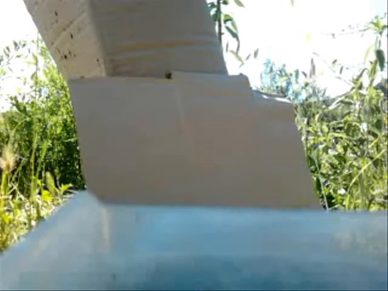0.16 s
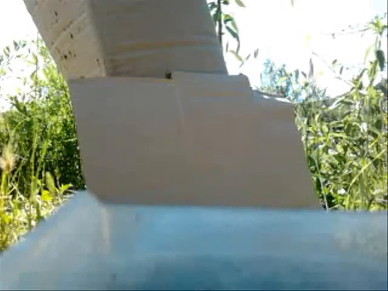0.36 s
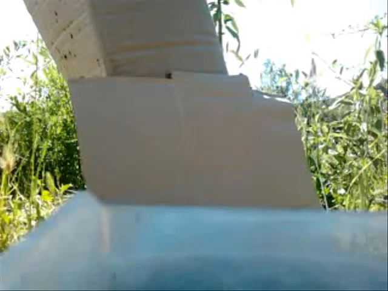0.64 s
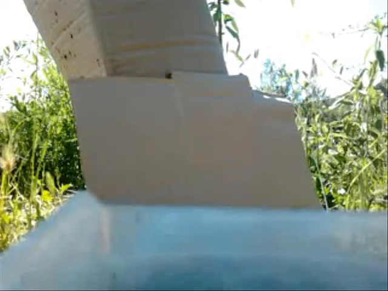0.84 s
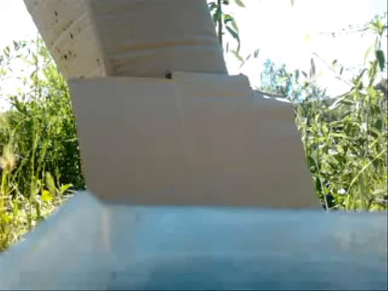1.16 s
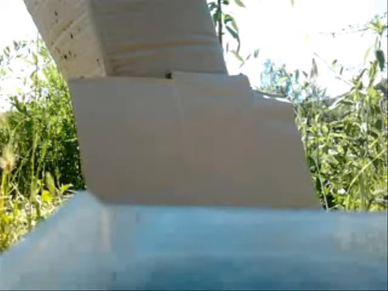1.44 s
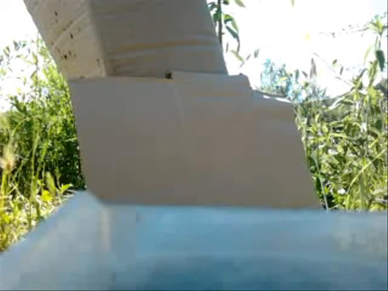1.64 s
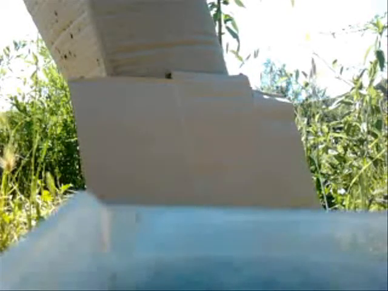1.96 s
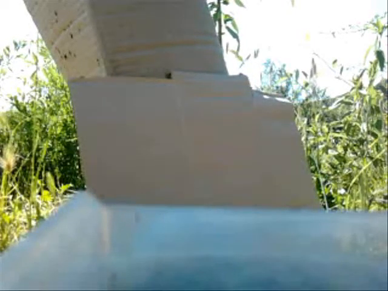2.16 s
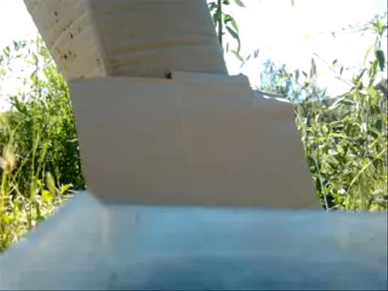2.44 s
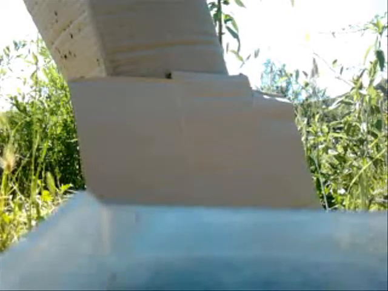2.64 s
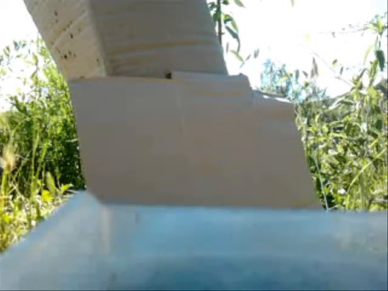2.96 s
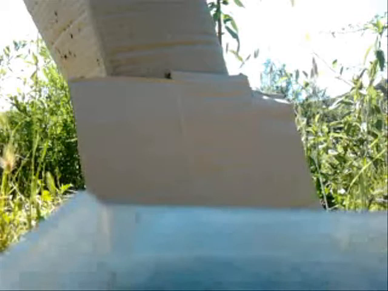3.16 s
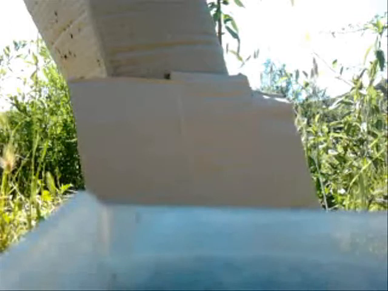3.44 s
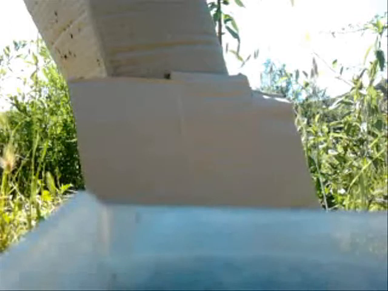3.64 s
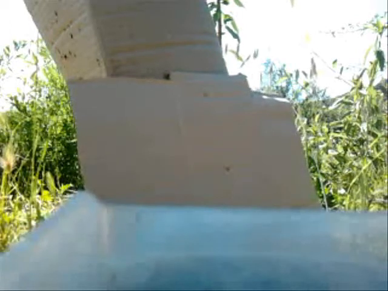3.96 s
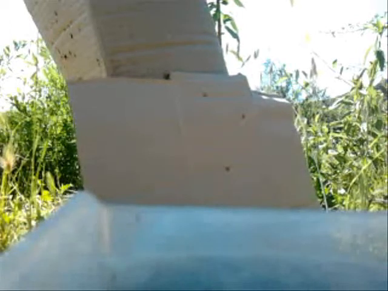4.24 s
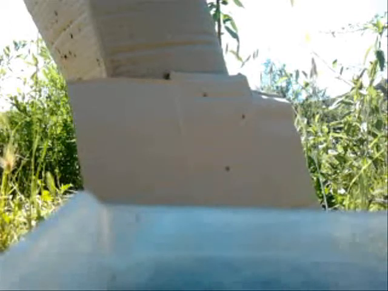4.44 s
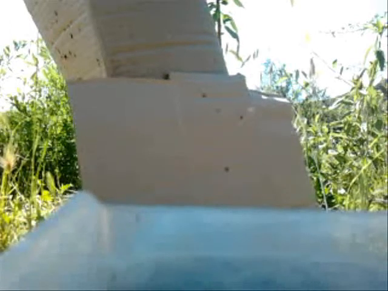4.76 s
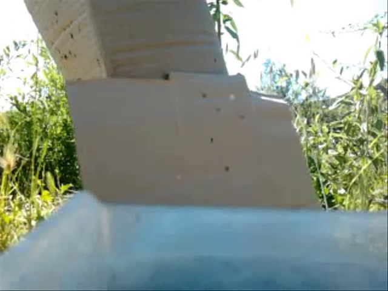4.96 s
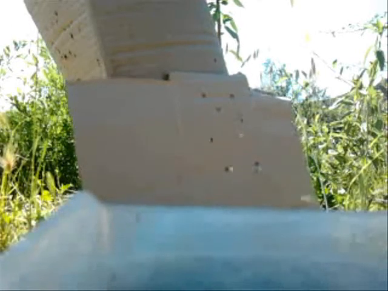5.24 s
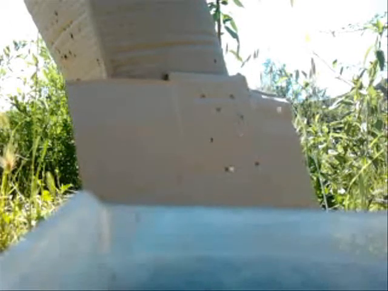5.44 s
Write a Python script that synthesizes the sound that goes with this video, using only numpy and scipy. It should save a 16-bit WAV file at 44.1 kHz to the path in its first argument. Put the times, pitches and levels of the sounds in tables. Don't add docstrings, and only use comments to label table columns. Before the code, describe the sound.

Quiet garden with faint bird chirps, then distant air rifle bursts and hard plastic pellets smacking loudly through a thin board close by.

```python
import sys
import numpy as np
from scipy import signal
from scipy.fft import rfft, irfft
from scipy.io import wavfile
from scipy.ndimage import uniform_filter1d

SR = 44100
rng = np.random.default_rng(int(sys.argv[2]) if len(sys.argv) > 2 else 0)


def field_ratio(decibels):
    return 10 ** (np.asarray(decibels, dtype=float) / 20)


def store_pcm(level_fs):
    pcm = np.round(np.clip(level_fs, -1, 1) * 32767).astype(np.int16)
    wavfile.write(sys.argv[1], SR, np.atleast_2d(pcm).T)


N = 246959


def noise(size):
    return rng.standard_normal(size)


def evened(x):
    return x / np.sqrt(np.mean(x ** 2) + 1e-20)


def coloured(points, size):
    f, db = np.transpose(points)
    hz = np.fft.rfftfreq(size, 1 / SR)
    gain = field_ratio(np.interp(np.log(hz + 1), np.log(f), db))
    return evened(irfft(rfft(noise(size)) * gain, size))


def wobble(size, span):
    once = uniform_filter1d(noise(size), round(span))
    return evened(uniform_filter1d(once, round(span)))


def patchy(x, db):
    z = signal.stft(x, nperseg=128)[2]
    patches = uniform_filter1d(noise(z.shape), size=3, axis=0)
    patches = uniform_filter1d(patches, size=8, axis=1)
    return evened(signal.istft(z * field_ratio(db * evened(patches)), nperseg=128)[1][:len(x)])


def resonate(x, hz, width):
    turn = np.exp(2j * np.pi * np.cumsum(hz * np.ones(len(x))) / SR)
    r = np.exp(-np.pi * width / SR)
    return 2 * (turn * signal.lfilter([1 - r], [1, -r], x / turn)).real


def struck(t, rise, t60):
    shape = (1 - np.exp(-t / rise)) ** 2 * field_ratio(-60 * t / t60)
    return shape / shape.max()


def sine(t, hz):
    return np.sin(2 * np.pi * (hz * t + rng.random()))


# frequency in Hz, level in dB per Hz.
AIR = [(18, -34.5), (30, -17.5), (54, -11.5), (117, -13), (178, -1), (237, 1), (1190, -10.5), (2120, -13.5),
       (3280, -11.5), (3870, -21.5), (4200, -42), (5460, -65.5), (9240, -120)]


def garden_air():
    return field_ratio(-58.5) * patchy(coloured(AIR, size=N + 1), db=1.15)[:N]


# start in seconds, length in seconds, start pitch in Hz,
# end pitch in Hz, level in dB.
CHIRPS = [(0.116, 0.077, 3400, 3120, -60.5), (0.639, 0.079, 3550, 3020, -54),
          (0.673, 0.031, 3000, 2590, -58), (0.852, 0.025, 3250, 3010, -50), (0.929, 0.027, 3100, 3580, -62),
          (1.066, 0.1, 3400, 2640, -54.5), (1.245, 0.0084, 3700, 3320, -54.5),
          (1.278, 0.061, 3500, 3270, -61.5), (1.387, 0.046, 3550, 3420, -60),
          (1.517, 0.065, 3400, 3600, -58.5), (1.622, 0.046, 3600, 3190, -58),
          (2.072, 0.039, 3300, 2990, -50)]


def chirp(s, length, start_hz, end_hz, db):
    t = np.arange(round(length * SR)) / SR
    hz = start_hz + (end_hz - start_hz) * t / length
    whistle = np.sin(2 * np.pi * np.cumsum(hz) / SR)
    breath = evened(resonate(noise(len(t)), hz, 180))
    tone = (1.1 * whistle + .9 * breath) * np.hanning(len(t))
    smear = noise(4000) * field_ratio(-60 * np.arange(4000) / SR / 0.22)
    wet = signal.fftconvolve(tone, smear / np.linalg.norm(smear))
    return s, field_ratio(db) * (np.pad(tone, (0, len(wet) - len(t))) + 0.53 * wet)


# frequency in Hz, width in Hz, level in dB.
RIFLE = [(170, 180, -2), (526, 142, 6.5), (940, 680, -9.5), (1900, 254, 7), (2600, 720, -6),
         (3243, 1200, -9), (3220, 280, 5.5)]


def casing(x):
    out = 0
    for k, (hz, width, db) in enumerate(RIFLE):
        out = out + (-1) ** k * field_ratio(db) * resonate(resonate(x, hz, width), hz, width)
    return evened(out)


# frequency in Hz, level in dB per Hz.
BUSHES = [(59, -45), (100, -16), (215, 3.5), (550, -7), (839, -9), (1200, -8), (2250, -7.5), (2930, -16.5),
          (3480, -15), (4200, -24.5), (5460, -51.5), (9240, -120)]
# start in seconds, level in dB.
SHOTS = [
    (2.24, -24.5),
    (2.965, -23.5),
    (3.072, -24.5),
    (3.752, -24.5),
    (3.85, -21.5),
    (3.935, -24),
    (4.496, -24),
    (4.602, -23),
    (4.684, -25.5),
]


def shot(s, db):
    t = np.arange(8192) / SR
    slap = struck(t, 0.0039, .032) * casing(noise(len(t)))
    answer = casing(noise(len(t))) + 0.28 * coloured(BUSHES, size=len(t))
    answer = struck(t, 0.042, 0.59) * patchy(answer, db=10.0)
    return s - .002, field_ratio(db - 7.5) * (slap + field_ratio(-23) * answer)


def gears(rows):
    s, db = np.transpose(rows)
    t = np.arange(s[0], s[-1], 1 / SR)
    unevenness_db = 1.1 * evened(uniform_filter1d(noise(len(t)), 500))
    chatter = noise(len(t)) * field_ratio(unevenness_db)
    sound = casing(chatter) + 0.47 * coloured(BUSHES, size=len(t))
    return s[0], field_ratio(np.interp(t, s, db)) * sound * signal.windows.tukey(len(t), .1)


# start in seconds, end in seconds, level in dB once up to speed.
TRIGGER = [
    (2.242, 2.414, -56.5),
    (2.973, 3.334, -56.5),
    (3.759, 4.049, -52.5),
    (4.455, 4.787, -53),
]


def trigger(start, end, db):
    spin_up_s, spin_up_db = .05, 3
    return gears([(start, db + spin_up_db), (start + spin_up_s, db), (end, db)])


# start in seconds, level in dB.
DRUM = [
    (2.403, -23.5),
]
# frequency in Hz, level in dB, t60 in seconds.
DRUM_RING = [(451, 0, 1.12), (538, 0, 1.26), (606, 1, 0.58), (790, -12, 0.59), (996, 1.5, 0.34),
             (3500, -0.5, 0.39)]
# frequency in Hz, level in dB per Hz.
DRUM_CLATTER = [(35, -47), (60, -13), (177, -21.5), (253, -26.5), (297, -13.5), (325, -20.5), (563, -5.5),
                (627, -10.5), (995, -17), (1280, -19.5), (2550, -12), (3160, -11), (4200, -24.5),
                (5460, -56), (9240, -120)]


def drum(s, db):
    t = np.arange(32768) / SR
    fall = struck(t, 0.00095, 0.061) + field_ratio(-7) * struck(t, 0.0074, 0.45)
    out = fall * patchy(coloured(DRUM_CLATTER, size=len(t)), db=3.2)
    for hz, mode_db, t60 in DRUM_RING:
        ring = sine(t, hz) * (1 + 0.38 * wobble(len(t), 880))
        out += field_ratio(mode_db - 21.0) * struck(t, 0.016, t60) * ring
    return s - .001, field_ratio(db + 0.5) * out


# start in seconds, length in seconds, level in dB.
SKIMS = [
    (3.304, 0.09, -38.5),
    (4.022, 0.037, -31.5),
    (4.849, 0.034, -18),
    (4.938, 0.047, -31.5),
    (5.17, 0.0062, -14.5),
    (3.228, 0.012, -47),
    (4.19, 0.0058, -20.5),
    (5.513, 0.048, -24.5),
    (5.579, 0.017, -23.5),
]


def skim(s, length, db):
    t = np.arange(round(length * SR)) / SR
    return s, field_ratio(db) * np.sqrt(t / length) * coloured(BUSHES, size=4096)[:len(t)]


# frequency in Hz, level in dB per Hz.
CRACK = [(530, -21), (900, -5), (1080, -10.5), (1550, 0), (2260, -3), (2870, -3), (3760, -4), (4200, -14.5),
         (5460, -51), (9240, -120)]
# start in seconds, peak in dB, pitch in Hz, t60 in seconds,
# crackle share.
BOUNCES = [
    (3.246, -42, 710, 0.022, 0.28),
    (3.292, -37, 2900, 0.035, 0.57),
    (3.4, -25, 670, 0.11, 0.48),
    (4.159, -15.5, 1500, 0.019, 0.52),
    (4.29, -22.5, 2180, 0.025, 0.13),
    (4.317, -28.5, 2083, 0.042, 0.5),
]
# start in seconds, peak in dB, pitch in Hz, t60 in
# seconds, # crackle share.
MORE_BOUNCES = [
    (3.486, -30, 366, 0.034, 0.039),
    (3.498, -37, 360, 0.045, 0.073),
    (4.347, -30, 381, 0.13, 0.45),
    (4.376, 3, 2970, 0.0096, 0.28),
    (4.831, -23, 850, 0.092, .05),
    (5.390, -2.5, 1420, 0.011, 0.89),
    (5.404, -26, 1440, 0.019, 1),
    (5.587, -7, 497, 0.01, 0.23),
]


def bounce(s, db, hz, t60, crackle):
    t = np.arange(4096) / SR
    width = 0.27 * hz
    pitch = resonate(resonate(noise(len(t)), hz, width), hz, width)
    tick = struck(t, 0.0017, t60) * (crackle * coloured(CRACK, size=len(t)) + evened(pitch))
    return s - .0015, field_ratio(db) * tick / abs(tick).max()


def punch(s, db, hz, crack_db):
    rise_s, tearing_s = 0.0011, 0.017
    t = np.arange(4096) / SR
    tear = struck(t, rise_s, 0.15) * np.exp(-(t / tearing_s) ** 2)
    out = field_ratio(crack_db + 3.5) * tear * coloured(CRACK, size=len(t))
    for factor, mode_db in ((.985, 0.5), (1.14, -39), (1.33, -15)):
        ring = sine(t, hz * factor) * (1 + 0.72 * wobble(len(t), 60))
        out += field_ratio(db + mode_db) * struck(t, rise_s, 0.035) * ring
    return s - .0035, out


# frequency in Hz, level in dB, t60 factor.
BOARD = [(243.2, -0.5, 0.92), (334.9, 3.5, 0.83), (484, -5, 0.6), (659.6, -1, 0.73), (850, -6, 0.4)]


def blow(s, db, hz, low_db, swell, t60):
    t = np.arange(8192) / SR
    out = np.zeros(len(t))
    for f, mode_db, longer in BOARD:
        f = f * (hz / 660) ** 0.596 * (1 + 0.04 * rng.standard_normal())
        ring = sine(t, f) * (1 + .6 * wobble(len(t), 90))
        level = field_ratio(mode_db + low_db * (f < 400))
        out += level * struck(t, swell * 660 / f, t60 * longer) * ring
    return s + .0005, field_ratio(db + 0.5) * out


def echo(s, db, first_hz, second_hz):
    t = np.arange(16384) / SR
    spread = coloured(BUSHES, size=len(t))
    tint = evened(resonate(spread, first_hz, 210)) + 0.84 * evened(resonate(spread, second_hz, 400))
    return s, field_ratio(db) * struck(t, 0.0087, 0.37) * patchy(spread + 0.84 * tint, db=4.0)


# start in seconds, panel swing in dB,
# panel pitch in Hz, swell time in seconds, face ring in dB.
HITS = [(3.337, -3.5, 704, 0.004, -4.5), (4.0357, -9, 765, 0.0066, -18), (4.1055, -4, 606, 0.0018, -15),
        (4.1963, 0, 608.5, 0.0051, -4.5), (4.762, -2, 781, 0.00078, -2), (4.8622, -2.5, 687, .007, -3),
        (4.9636, -6.5, 626, 0.014, -15.5), (5.0351, -8, 617, 0.0047, -13), (5.1261, -2.5, 521, 0.005, -1),
        (5.1824, -2, 661, 0.0015, -0.6), (5.2767, -5, 482, 0.003, -2.7), (5.3591, -4, 656, 0.0031, -9),
        (5.4228, 3.6, 816, 0.0086, -3.5), (5.5314, -3, 466, 0.0016, -12)]
# level in dB, favoured pitch in Hz.
RETURNS = [(-30.5, 1500), (-24, 1800), (-25.5, 2055), (-28, 2100), (-27.5, 1883), (-25, 2070),
           (-26.5, 2180), (-28.5, 2300), (-30, 1600), (-26, 2050), (-26, 1570), (-26, 1900), (-26.5, 1650),
           (-28, 1900)]


def pellet(s, db, hz, swell, face_db, echo_db, echo_hz):
    face, high = rng.standard_normal(2).clip(-2, 2)
    face_hz = 1420 * (1 + 0.038 * face)
    high_hz = 2900 * (1 + 0.06 * high)
    crack_db = -12.5 + 0.29 * db
    flex_db = -13.5 - 0.79 * min(db, 0)
    swing_t60 = 0.062 * (swell / 0.0038) ** -.35
    return [punch(s, face_db, face_hz, crack_db),
            blow(s - 0.001115, db, hz, flex_db, swell, swing_t60),
            echo(s + .019, echo_db, echo_hz, high_hz)]


def add(mix, s, sound):
    part = mix[round(s * SR):][:len(sound)]
    part += sound[:len(part)]


def scene():
    mix = garden_air()
    sources = ((chirp, CHIRPS), (shot, SHOTS), (trigger, TRIGGER), (drum, DRUM), (skim, SKIMS),
               (bounce, BOUNCES), (bounce, MORE_BOUNCES))
    for source, table in sources:
        for row in table:
            add(mix, *source(*row))
    for hit, back in zip(HITS, RETURNS):
        for part in pellet(*hit, *back):
            add(mix, *part)
    return mix[None]


def filtered(x, order, hz, kind="low"):
    return signal.sosfilt(signal.butter(order, hz, kind, fs=SR, output="sos"), x)


def softened(x, order, hz):
    return signal.sosfiltfilt(signal.butter(order, hz, fs=SR, output="sos"), x)


def thinned(x, from_hz, share):
    hz, _, z = signal.stft(x, SR, nperseg=1024)
    band = (40 * np.log(hz / from_hz + 1e-9)).astype(int).clip(-1)
    luck = uniform_filter1d(noise((band.max() + 2, z.shape[-1])), size=5, axis=1)
    lucky = luck > np.quantile(luck, np.clip(share, 0, 1))
    kept = lucky[band] | (hz < from_hz)[:, None]
    kept |= abs(z[0]).max(axis=0) > .03
    return signal.istft(z * kept, SR, nperseg=1024)[1][:, :N]


def low_pass(x):
    return signal.sosfilt(signal.butter(12, 15400, fs=SR, output="sos"), x)


def record(dry):
    first_rate_hz = 8000
    over = .99 * dry / (1 + abs(dry) ** 5) ** (1 / 5.5)
    narrow = filtered(filtered(over, 10, 3750), 1, 130, "high")
    mirror = narrow * np.cos(2 * np.pi * first_rate_hz * np.arange(N) / SR)
    edge = signal.ellip(8, 1, 70, 4720, fs=SR, output="sos")
    full = thinned(signal.sosfilt(edge, narrow + field_ratio(-10) * mirror), 3850, .35)

    splatter = np.clip(full, -.97, .97) - full
    fraying = np.clip(full, -.79, .79) - full
    smear = noise(2048) * np.exp(-(np.arange(2048) / SR / 0.022) ** 4)
    haze = signal.oaconvolve(fraying, smear[None] / np.linalg.norm(smear))[:, :N]
    haze = thinned(filtered(haze, 4, 4800, "high"), 6700, 0.49)
    splatter = softened(splatter, 1, 17000) + field_ratio(-15.5) * filtered(haze, 8, 12200)
    return low_pass(full + softened(splatter, 6, 15800))


dry = scene()
out = record(dry)
store_pcm(out)
```